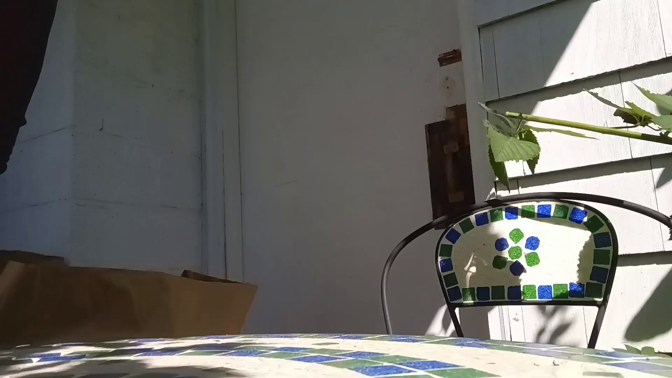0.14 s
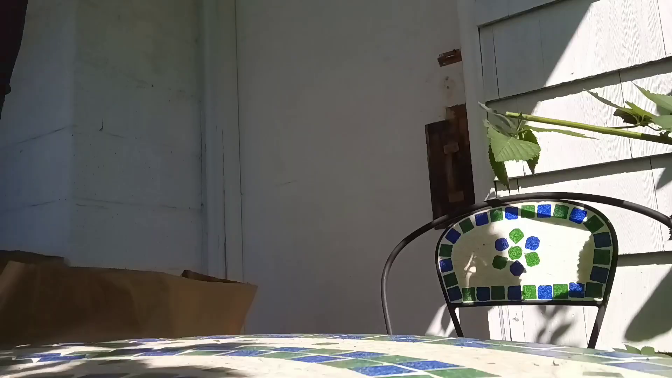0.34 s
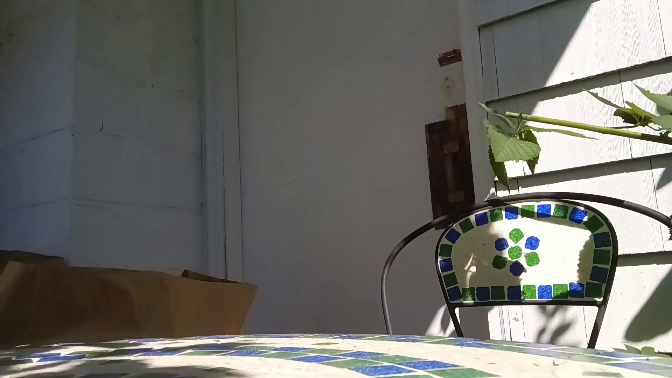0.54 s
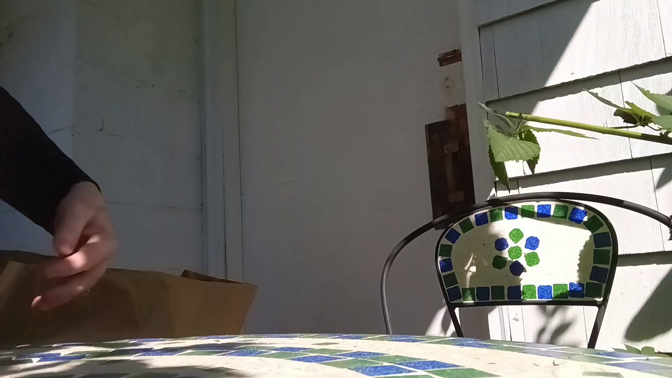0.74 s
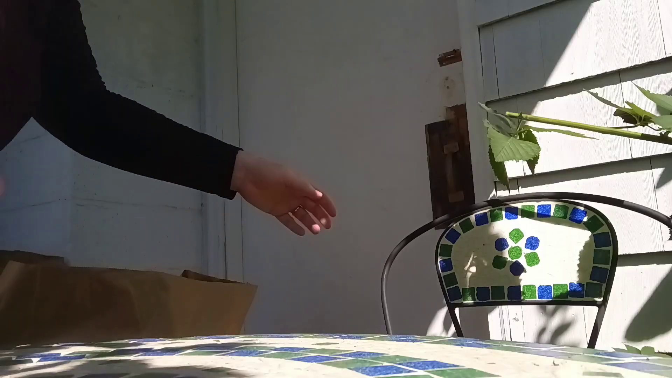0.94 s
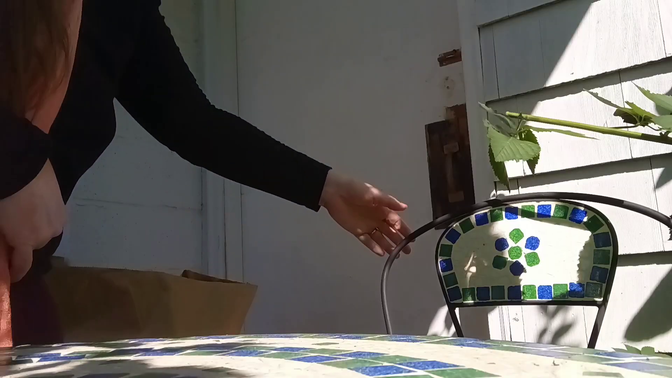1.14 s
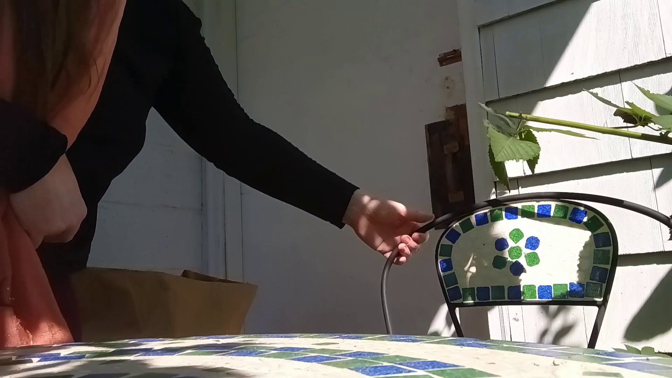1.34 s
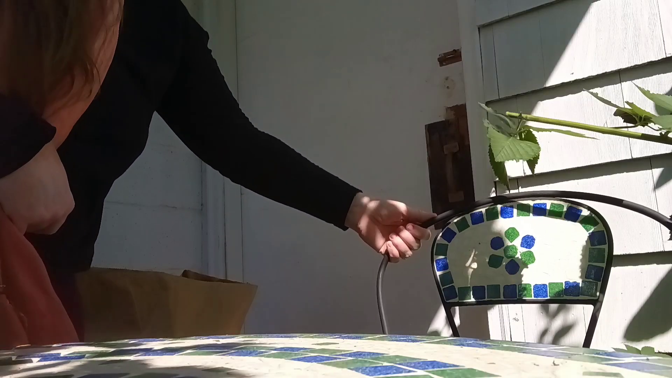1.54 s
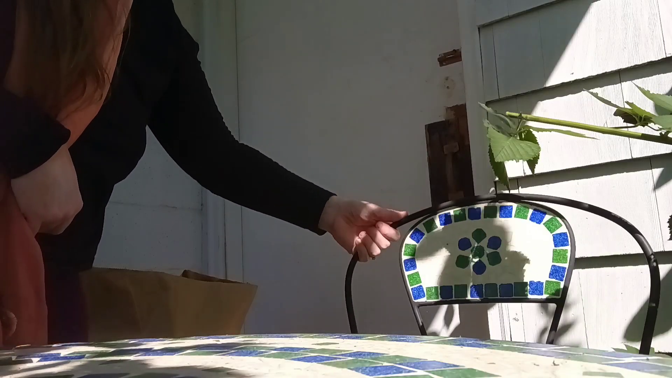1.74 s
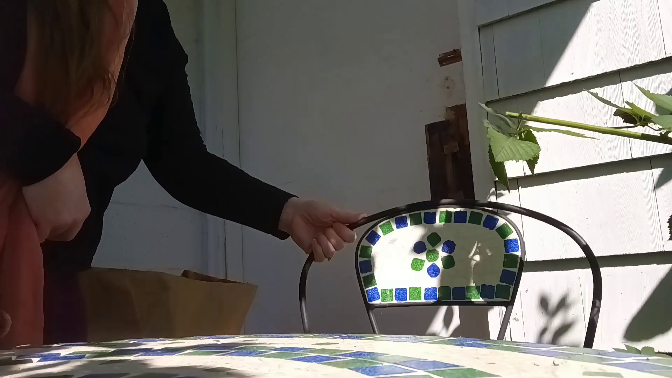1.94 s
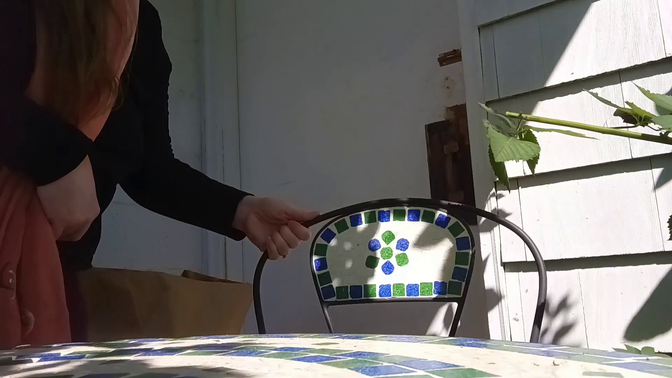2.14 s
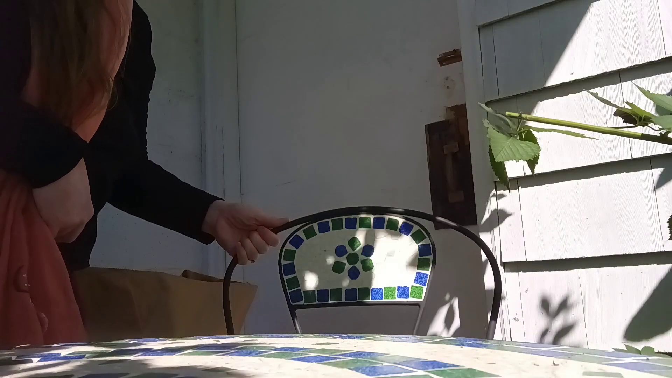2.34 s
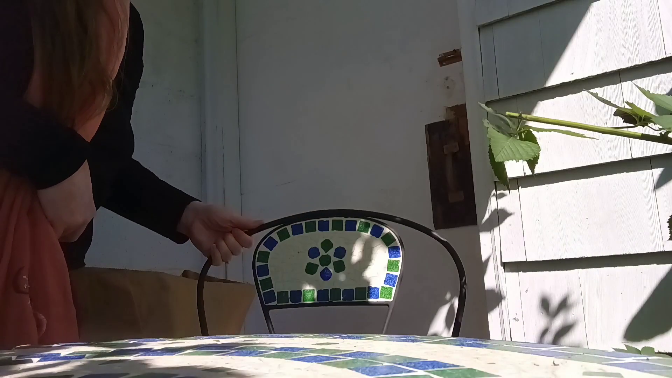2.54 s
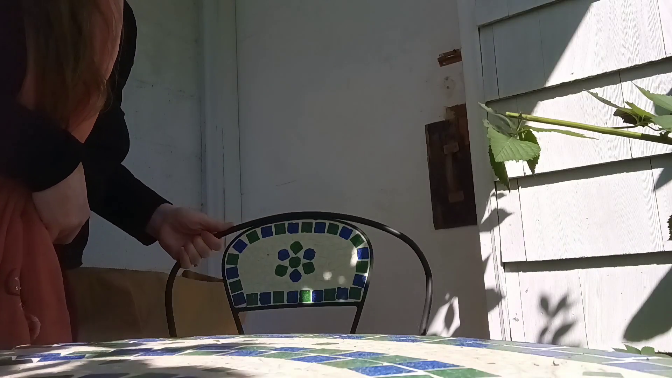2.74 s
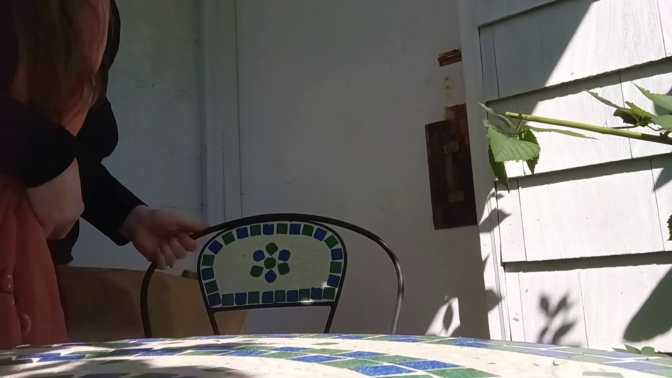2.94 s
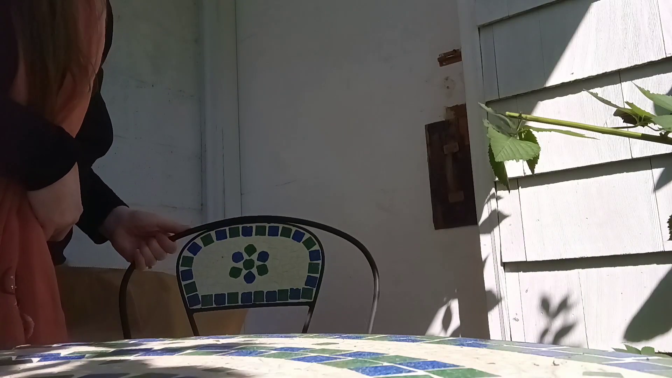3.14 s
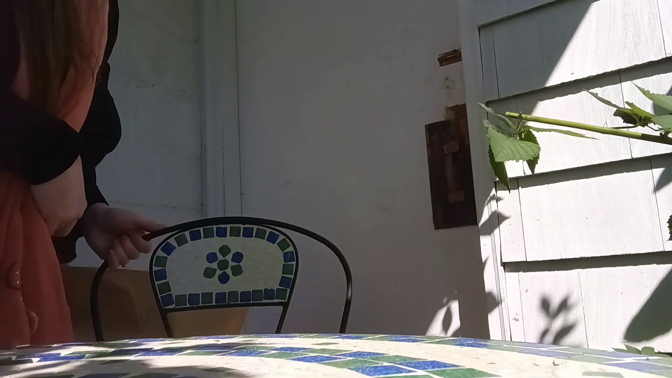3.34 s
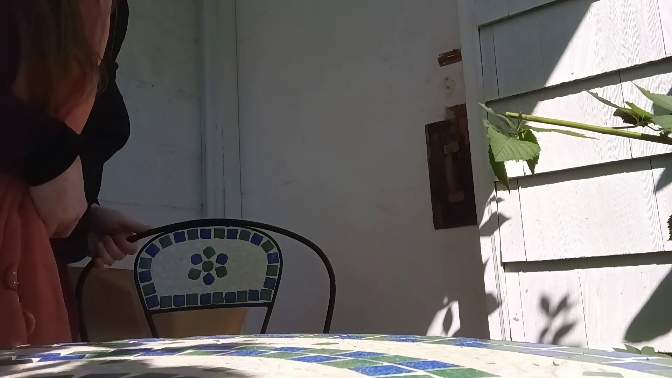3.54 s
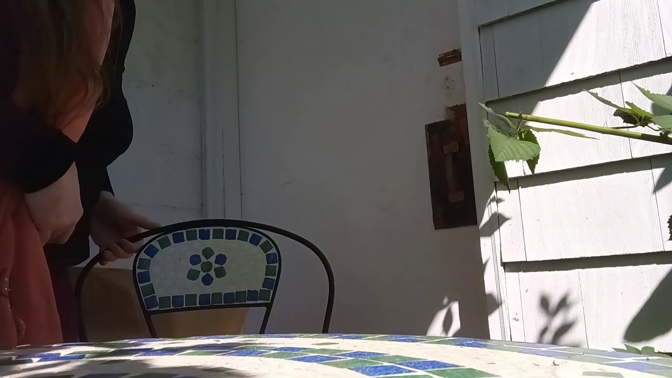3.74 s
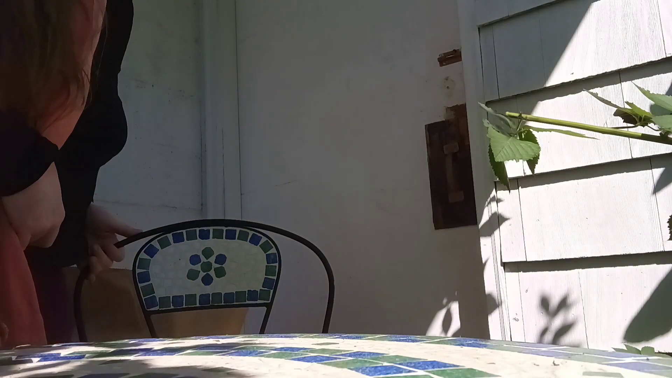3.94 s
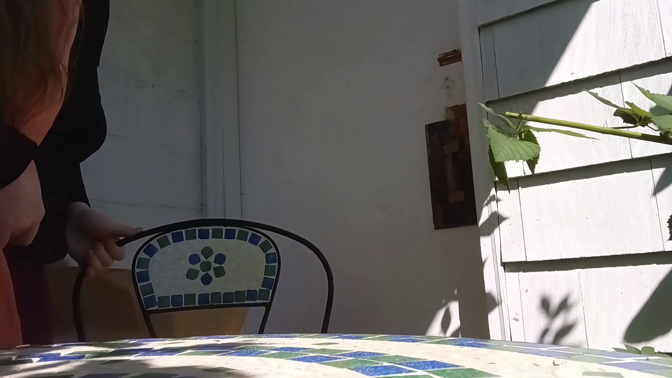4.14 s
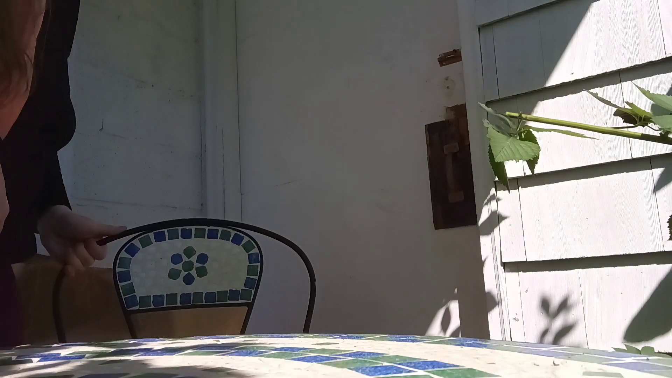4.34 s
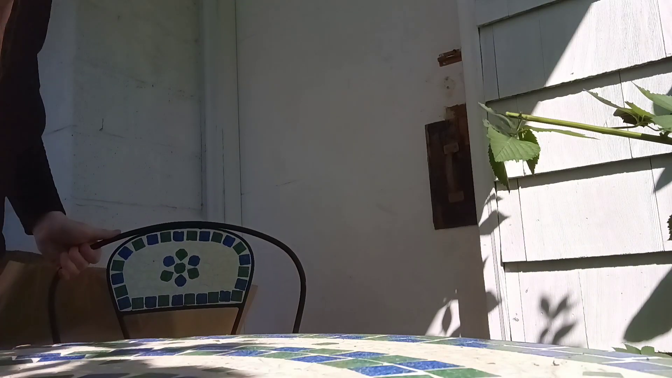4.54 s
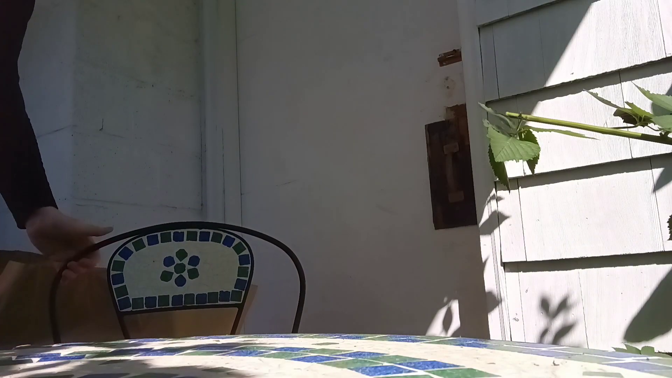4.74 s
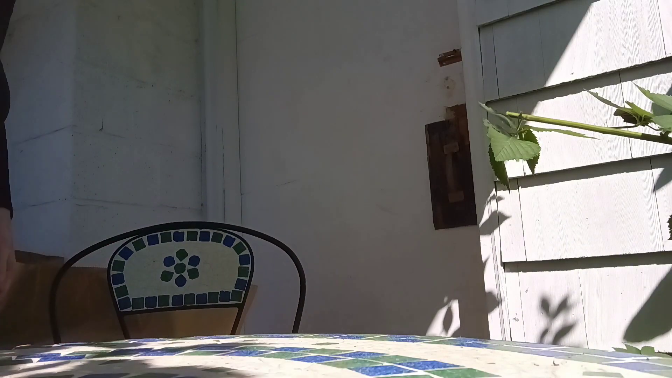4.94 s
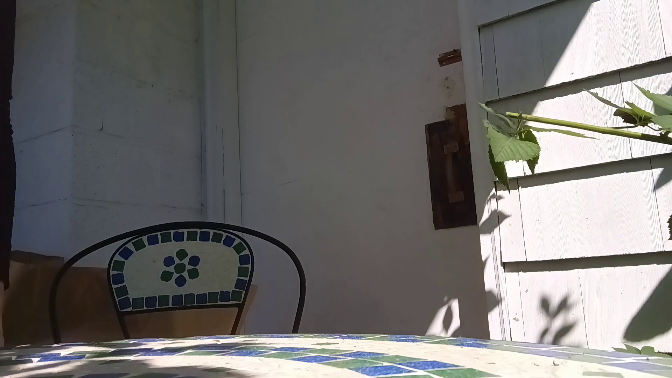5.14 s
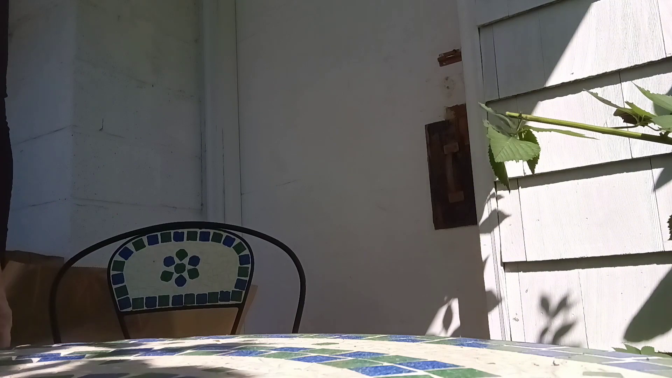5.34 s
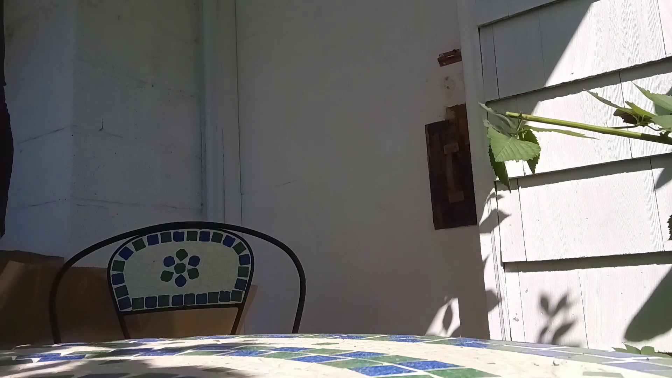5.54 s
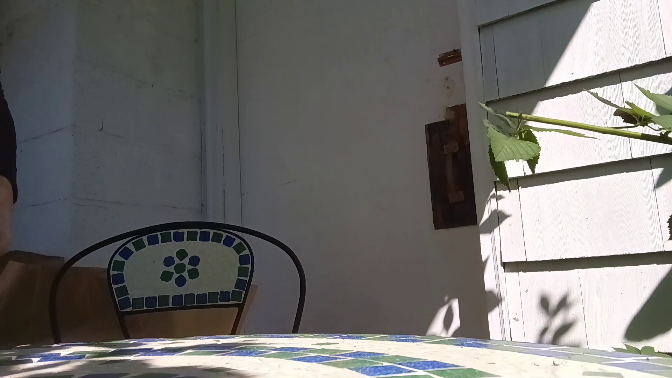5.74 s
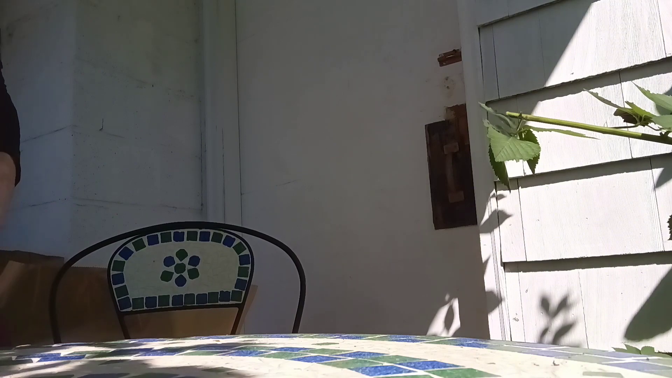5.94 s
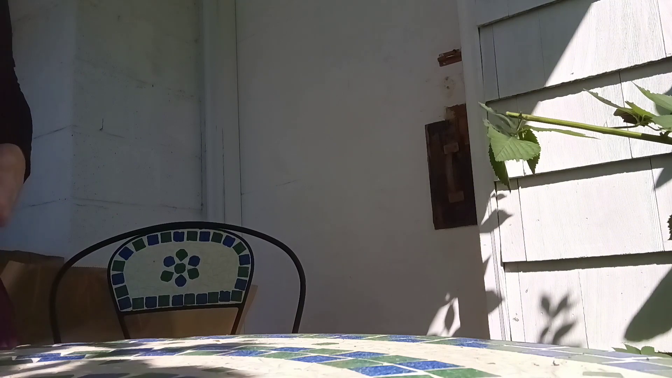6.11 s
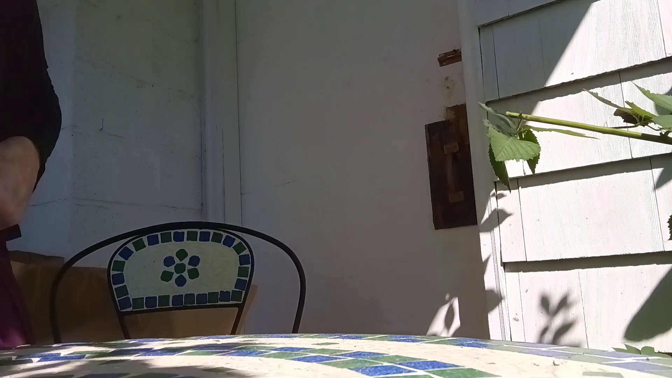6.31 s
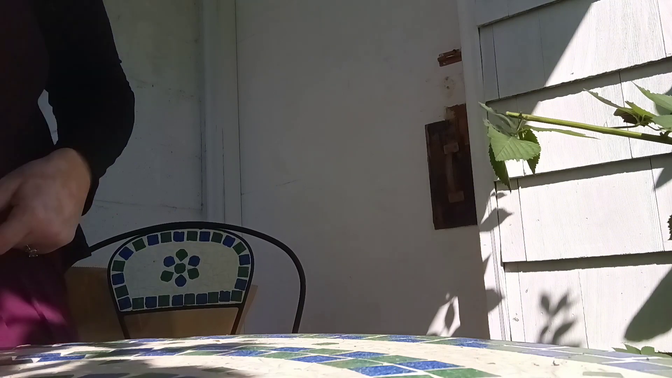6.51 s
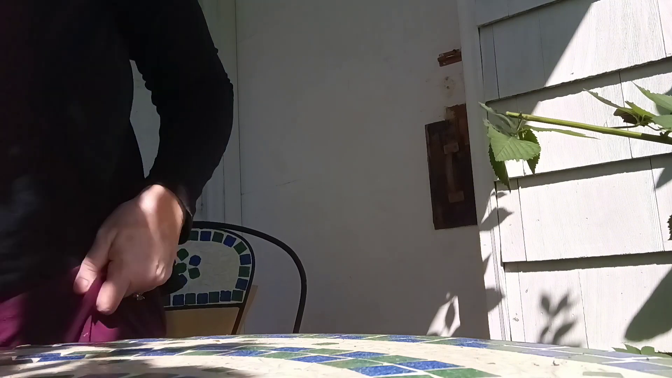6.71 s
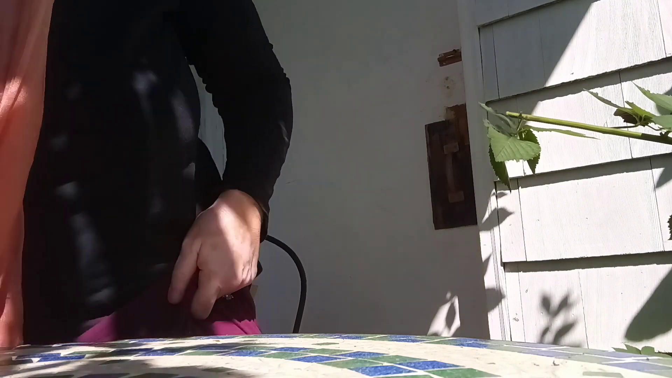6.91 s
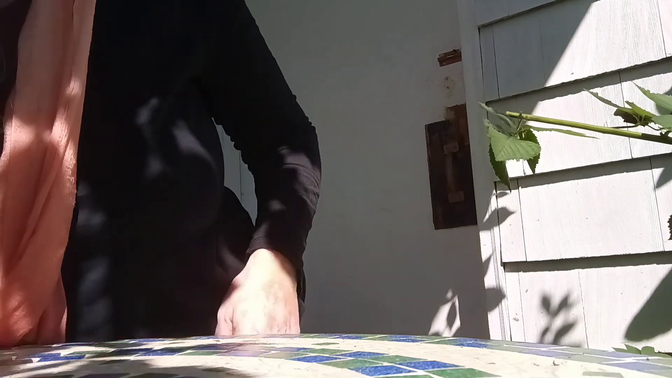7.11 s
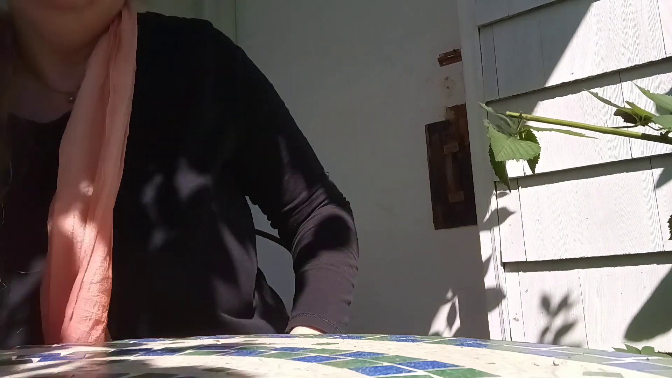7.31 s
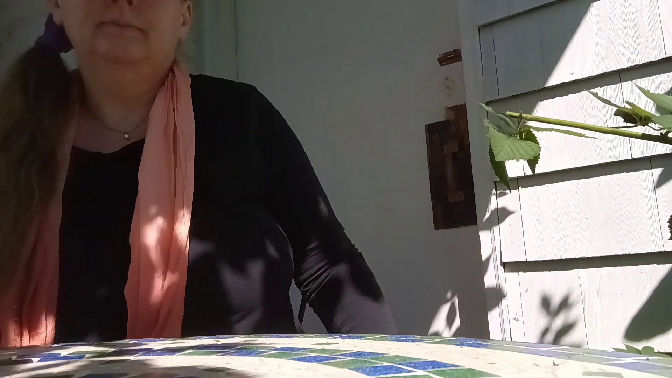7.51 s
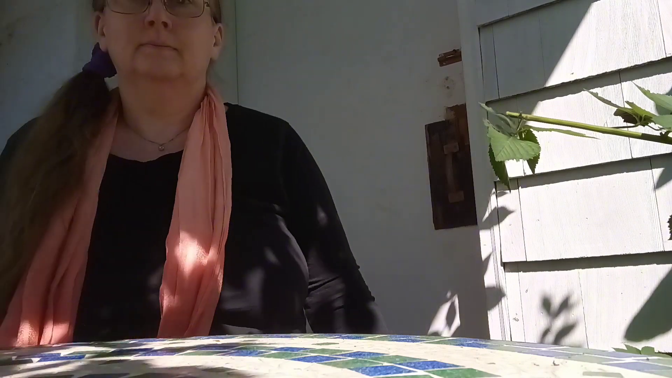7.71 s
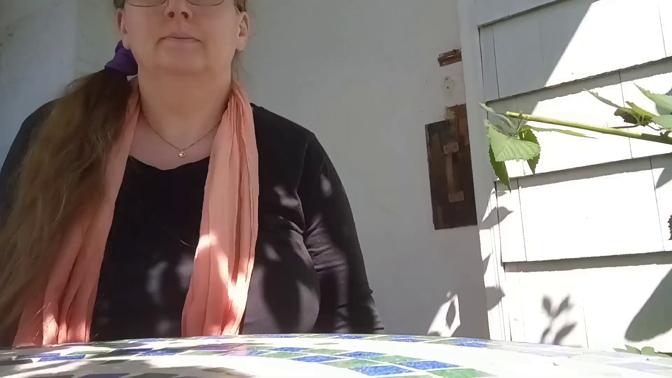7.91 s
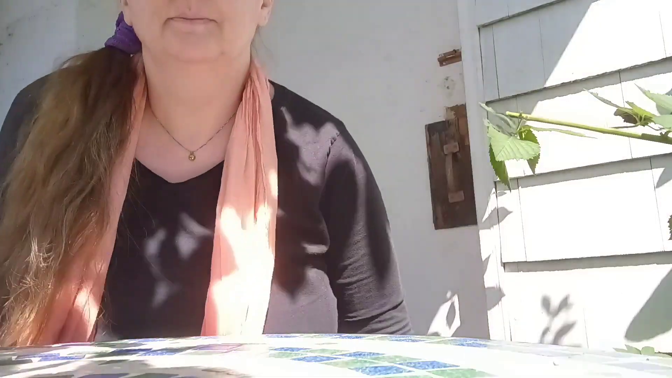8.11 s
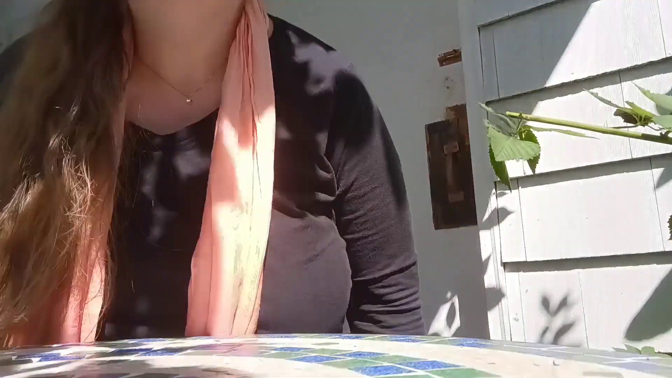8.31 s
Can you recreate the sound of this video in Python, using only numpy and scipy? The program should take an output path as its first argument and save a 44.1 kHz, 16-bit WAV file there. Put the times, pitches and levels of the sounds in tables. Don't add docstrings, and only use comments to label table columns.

```python
import sys
import numpy as np
from scipy import signal
from scipy.fft import rfft, irfft, next_fast_len
from scipy.io import wavfile
from scipy.ndimage import uniform_filter1d, map_coordinates

SR = 44100
rng = np.random.default_rng(int(sys.argv[2]) if len(sys.argv) > 2 else 0)


def gain_from_decibels(decibels):
    exponent = np.asarray(decibels, float) / 20
    return 10 ** exponent


def inscribe(sig):
    pcm = np.round(np.clip(np.atleast_2d(sig).T, -1, 1) * 32767)
    wavfile.write(sys.argv[1], SR, pcm.astype(np.int16))


N = 368763
SIZE = next_fast_len(N + SR)
HZ, T = np.fft.rfftfreq(SIZE, 1 / SR), np.arange(N) / SR
SEATED_S = 7


def read(points, hz=HZ):
    f, value = np.transpose(points)
    return np.interp(np.log(hz + 1), np.log(f + 1), value)


def modes(table):
    response = 0
    for k, (f, width, db) in enumerate(table):
        response = response + (-1) ** k * gain_from_decibels(db) / (1 + 2j * (HZ - f) / width)
    return response


def through(x, response):
    gain = np.sqrt(np.mean(abs(response) ** 2))
    return irfft(rfft(x, SIZE) * response / gain, SIZE)[..., :N]


def noise():
    return rng.standard_normal((2, N))


def wander(hz):
    x = irfft(rfft(rng.standard_normal(N), SIZE) * np.exp(-(HZ / hz) ** 2), SIZE)[:N]
    return x / x.std()


def bump(s, length, skew=0.47):
    out = np.zeros(N)
    span = slice(round(s * SR), round((s + length) * SR))
    out[span] = np.sin(np.pi * np.clip((T[span] - s) / length, 0, 1) ** skew) ** 2
    return out


def dying(s, t60, rise):
    out = np.zeros(N)
    span = slice(round(s * SR), round((s + 2 * t60) * SR))
    u = np.maximum(T[span] - s, 0)
    out[span] = gain_from_decibels(-60 * u / t60) * (1 - np.exp(-u / rise))
    return out


def whistle(s, hz, length, db, width, pulses=0, pure=0, sag_hz=0):
    t = np.arange(round(length * SR)) / SR
    r = np.exp(-np.pi * width / SR)
    re, im = rng.standard_normal((2, 2, SR // 3))[..., :len(t)]
    fuzz = pure + signal.lfilter([np.sqrt(1 - r * r)], [1, -r], re + 1j * im)
    pulse = 1 + .5 * np.sign(pulses) * np.cos(2 * np.pi * pulses * t)
    swell = signal.windows.tukey(len(t), .6) * pulse
    carrier = np.exp(2j * np.pi * (hz + sag_hz * (.5 - .5 * t / length)) * t)
    return s, gain_from_decibels(db) * swell * (fuzz * carrier).real


def add(mix, s, sound):
    part = mix[:, round(s * SR):][:, :sound.shape[-1]]
    part += sound[..., :part.shape[1]]


def rocking(x, patchy_db, size=1024):
    # (time [s], length [s], frequency [Hz], level [dB])
    group_swells = [(1.58, 0.57, 823, -6.5), (2.19, 0.26, 840, -4), (3.4, 0.26, 1170, -4), (3.62, .3, 410, -4),
                    (4.6, 0.33, 352, -5.5), (1.706, 0.53, 495, 11), (1.75, 0.28, 1230, 4), (1.73, 0.17, 3750, -1),
                    (2.11, 0.4, 1220, 3), (2.4, 0.22, 3750, -0.5), (3.8, 0.22, 700, 0), (3.25, 0.13, 4050, -3),
                    (3.36, 0.27, 1530, -8), (3.42, 0.13, 3700, 6.5), (4.309, 0.26, 4420, 5.5),
                    (4.32, 0.26, 5250, -3), (2.4, 0.3, 1490, -4), (4.15, 0.16, 800, -3), (4.25, 0.29, 1700, -1),
                    (4.691, 0.27, 520, 10), (4.729, .35, 950, 0)]
    reach = 0.12
    hz, t, z = signal.stft(x, SR, nperseg=size, noverlap=size * 3 // 4)
    patches = rng.standard_normal(z.shape[:0:-1]).T
    patches = uniform_filter1d(patches, size=3, axis=0)
    patches = uniform_filter1d(patches, size=10240 // size, axis=1)
    patches *= np.linspace(.8, 1.8, len(patches))[:, None] / patches.std()
    group_db = 0
    for s, length, f, db in group_swells:
        group = np.exp(-((hz / f - 1) / reach) ** 2)
        group_course = np.sin(np.pi * np.clip((t - s) / length, 0, 1)) ** .5
        group_db = group_db + db * np.outer(group, group_course)
    z = z * gain_from_decibels(patchy_db * patches + group_db)
    return signal.istft(z, nperseg=size, noverlap=size * 3 // 4)[1][:, :N]


def yard():
    # (frequency [Hz], density [dB per Hz])
    wash_spectrum = [(15, -39), (25, -23), (49, -6.5), (113, -2), (457, -16.5), (804, -14.5), (1200, -19.5),
                     (3170, -22.5), (4500, -20.5), (5430, -9.5), (6210, -15), (6730, -12), (8500, -24),
                     (11200, -35), (14300, -49), (15500, -44)]
    # (time [s], level [dB], frequency [Hz])
    hum_track = [(0.1, -48, 120), (0.28, -43, 121.8), (1.02, -60, 121.6), (1.589, -49, 121),
                 (3.6, -57.5, 113.7), (4.05, -58, 112), (4.85, -40.5, 110.2), (5.901, -58, 114.6),
                 (6.38, -45.5, 112.4), (6.661, -54, 120.1), (7.3, -48, 120.8), (7.55, -42, 113.3),
                 (7.64, -45, 109), (8.36, -59, 116.5)]
    wash = gain_from_decibels(-49.5 + 0.31 * wander(0.65)) * through(noise(), gain_from_decibels(read(wash_spectrum)))
    s, hum_db, hum_hz = np.transpose(hum_track)
    turn = 2 * np.pi * np.cumsum(np.interp(T, s, hum_hz)) / SR
    hum = (1.19 + wander(28)) * np.cos(turn) + 0.83 * wander(15.4) * np.sin(turn)
    return wash + gain_from_decibels(np.interp(T, s, hum_db) - 1.5) * hum


def buzz():
    whine_hz, width_hz, mains_hz = 14150, 110, 60.25
    turn = 2 * np.pi * mains_hz * T
    pulse = 1 + 0.2 * np.cos(turn) + 0.25 * np.cos(2 * turn)
    fuzz = .3 * through(noise(), modes([(whine_hz, width_hz / 3, 0)]) ** 2)
    tone = 1.3 * np.cos(2 * np.pi * np.cumsum(whine_hz + 15 * wander(30.1)) / SR)
    return gain_from_decibels(-76.5) * pulse * (fuzz + tone)


def crickets():
    # (frequency [Hz], width [Hz], level [dB], pulse rate [1/s])
    chorus = [(6930, 27, -58.5, 13), (6780, 200, -64.5, 10), (5600, 2600, -63.5, 37)]
    # (time [s], frequency [Hz], length [s], level [dB])
    phrases = [(0.203, 5160, 0.22, -54), (0.315, 6020, .1, -57), (0.373, 5600, 0.1, -55),
               (0.627, 6170, .1, -63), (0.514, 5100, 0.13, -50), (0.725, 5100, 0.05, -59),
               (1.078, 5410, 0.17, -56), (1.508, 5400, .08, -54), (5.446, 5230, 0.19, -59.5),
               (5.567, 6200, 0.09, -56), (5.54, 5660, 0.2, -56), (5.689, 5400, 0.14, -53),
               (5.728, 4950, .07, -59), (5.849, 6100, 0.3, -60), (5.93, 5300, 0.085, -60),
               (6.1, 5130, 0.092, -57.5), (5.863, 5660, 0.31, -55.5), (6.184, 6170, 0.12, -58),
               (6.374, 5670, 0.17, -63), (6.313, 5530, 0.23, -58), (6.89, 6230, .1, -53.5),
               (7.134, 5180, 0.1, -50), (7.228, 6090, 0.12, -51.5), (7.544, 6130, 0.15, -53),
               (7.752, 5730, 0.16, -54), (7.91, 6125, 0.092, -52.5), (7.923, 5950, .1, -71),
               (8.192, 6100, 0.13, -54.5), (8.211, 5630, 0.12, -47)]
    # (time [s], level [dB])
    chirps = [
        (0.152, -52),
        (0.603, -50),
        (0.968, -51),
        (1.423, -50),
    ]
    out = np.zeros((2, N))
    for hz, width, db, pulses in chorus:
        beat = np.cos(2 * np.pi * pulses * np.cumsum(1 + 0.0406 * wander(1.485)) / SR)
        throb = 1 + .9 * beat
        out += gain_from_decibels(db + 2.3 * wander(4.0)) * throb * through(noise(), modes([(hz, width, 0)]) ** 2)
    for s, hz, length, db in phrases:
        add(out, *whistle(s, hz, length, db + 0.5, 30, pulses=35.4, pure=.8, sag_hz=161))
    for s, db in chirps:
        for k in range(3):
            pulse_db = db + 0.8 * k - 2.5
            add(out, *whistle(s + 0.0348 * k, 4555 + 25 * k, 0.032, pulse_db, 55, pure=1.5, sag_hz=-120))
    return out


def scuffs():
    # (time [s], level [dB], low part relative [dB], low part frequency [Hz], length [s])
    brushes = [(0.498, -32.5, -14, 2010, 0.13), (0.549, -46, -11.5, 521, 0.12),
               (0.947, -50.5, 12.5, 890, 0.066), (0.975, -30.5, -22, 717, 0.057),
               (1.222, -40.5, -24, 792, 0.12), (1.284, -28, -13.5, 1320, 0.066),
               (3.982, -38.5, -2.5, 968, 0.071), (5.22, -28, -11, 1920, 0.089),
               (5.723, -44, -5, 688, 0.069), (6.087, -39, -9.5, 701, 0.13), (6.669, -29.5, -17, 2010, 0.1),
               (6.713, -24, -14.5, 2460, 0.097), (6.881, -25, -16.5, 2380, 0.056),
               (7.03, -22.5, -40, 500, 0.072), (7.075, -17.5, -49.5, 2300, 0.079)]
    # (frequency [Hz], density [dB per Hz])
    hiss = [(710, -68), (1200, -30), (2210, -26), (2920, 0), (4340, 0), (5370, 8.5), (8980, -4.5),
            (11200, -21), (15500, -60)]
    high = sum(gain_from_decibels(db - 13) * bump(s, 1.21 * length, skew=0.48) for s, db, _, _, length in brushes)
    out = through(high * rocking(noise(), patchy_db=3.0), gain_from_decibels(read(hiss)))
    for s, db, low_db, low_hz, length in brushes:
        add(out, *whistle(s - .01, low_hz, length, db + low_db - 11.0, 440))
    return out


def effort():
    # (time [s], length [s], speed of the feet [dB], weight on the frame [dB])
    lurches = [(1.608, 0.14, -41, -49.5), (1.695, 0.09, -20.5, -28.5), (1.769, 0.15, -22, -22.5),
               (1.856, 0.22, -23, -33.5), (2.025, 0.17, -29, -32.5), (2.085, 0.18, -23.5, -27.5),
               (2.174, 0.43, -17.5, -28), (2.408, 0.26, -21, -31), (2.564, 0.2, -24.5, -31.5),
               (2.676, 0.69, -30.5, -31.5), (2.81, 0.41, -32.5, -30.5), (2.948, 0.23, -31, -28.5),
               (3.074, 0.25, -35.5, -23.5), (3.288, 0.25, -28, -26.5), (3.408, 0.21, -24.5, -18),
               (3.52, 0.32, -46, -36.5), (4.206, 0.15, -44, -41), (4.28, 0.11, -28.5, -25),
               (4.335, 0.13, -23, -67), (4.41, 0.23, -23, -19.5), (4.499, 0.17, -28, -19.5),
               (4.607, 0.21, -34, -21.5), (4.682, 0.11, -35, -27), (4.793, 0.12, -82, -42),
               (7.362, 0.21, -29, -41), (7.496, 0.075, -28.5, -54), (8.323, 0.2, -30, -25.5)]
    # (time [s], level [dB], length [s])
    landings = [(1.576, -44.5, 0.073), (2.936, -37.5, 0.48), (3.379, -32.5, 0.15), (3.503, -34, 0.21),
                (4.245, -33, 0.24), (4.582, -29, 0.32), (4.98, -42.5, 0.069), (5.098, -41.5, 0.049),
                (7.351, -29.5, 0.32), (7.67, -51, 0.41), (8.052, -41.5, 0.22), (1.685, -35, 0.056),
                (1.88, -41, 0.097), (2.06, -40, 0.08), (2.307, -59, .12), (3.7, -45, 0.19)]
    power = sum(gain_from_decibels(2 * np.c_[[speed, weight]]) * bump(s, length) for s, length, speed, weight in lurches)
    speed_db, weight_db = 10 * np.log10(power + 1e-12)
    by_speed = 0.88
    tubes_db = -0.5 + by_speed * speed_db + (1 - by_speed) * weight_db
    fine_db = -13 + 0.35 * (speed_db - weight_db) + 0.31 * np.maximum(speed_db, -40)
    thumps = sum(gain_from_decibels(db) * bump(s, length) for s, db, length in landings)
    ground = np.hypot(gain_from_decibels(-2.5 + 1.96 * weight_db), thumps)
    return gain_from_decibels(speed_db), gain_from_decibels(tubes_db), gain_from_decibels(weight_db), ground, gain_from_decibels(fine_db)


def stick_slip():
    # (time [s], level [dB], decay t60 [s])
    breaks = [(1.58, -15, 0.21), (1.591, -10, 0.18), (1.6977, 4.5, 0.21), (1.779, 4, 0.39), (1.92, -4, 0.7),
              (2.003, -27, 0.055), (2.0434, -6, 0.33), (2.120, -8, 0.19), (2.156, -4.5, 0.23),
              (2.181, -8, .1), (4.676, -27, 0.088), (4.842, -27, 0.095), (3.64, -29, 0.16),
              (2.432, 3, 0.64), (2.716, -6.5, 0.1), (2.938, -13, 0.12), (3.048, -23, 0.12),
              (3.147, -6, 0.18), (3.336, -10, 0.21), (3.414, -14.5, 0.25), (3.464, -2.5, 0.32),
              (3.592, -27, 0.12), (4.289, -13, 0.42), (4.328, -1.5, 0.19), (2.285, 5, 0.3),
              (2.4645, -1, 0.2), (2.886, -3, 0.16), (3.278, -6, 0.11), (4.22, -22, 1), (4.353, 5, 0.31),
              (4.455, -6, 0.12), (4.506, -0.5, 0.19), (7.375, 3.5, 0.12), (7.506, -12, 0.2),
              (8.275, -20.5, 0.13), (8.336, -22, 0.28)]
    slips = sum(gain_from_decibels(db - 14.5) * dying(s, t60, 0.0024) for s, db, t60 in breaks)
    snaps = sum(gain_from_decibels(db - 13.5) * dying(s, 0.038, 0.00027) for s, db, _ in breaks)
    stuck = np.ones(N)
    for s, _, _ in breaks:
        stuck *= 1 - 0.27 * (T < s) * np.exp(np.minimum(T - s, 0) / 0.016)
    judder = stuck * gain_from_decibels(1.38 * wander(25.5) + 1.0 * wander(110) + 2.14 * wander(610))
    return slips, judder, snaps


def knocks():
    # (time [s], level [dB], decay t60 [s])
    pushes = [(1.605, -16.5, 0.041), (1.641, -24.5, 0.079), (1.701, -6.5, 0.065), (1.831, -26, 0.055),
              (3.221, -22.5, 0.14), (3.246, -23.5, 0.04), (3.432, -25, 0.041), (3.608, -16.5, 0.11),
              (3.635, -13, 0.089), (4.259, -25, 0.043), (5.03, -37.5, 0.11), (6.169, -36.5, 0.17),
              (7.368, -18, 0.29), (8.12, -49, 0.15), (8.257, -50, 0.098)]
    return sum(gain_from_decibels(db + 4.0) * dying(s, t60, 0.012) for s, db, t60 in pushes)


def scraping_feet(grit, fine_force):
    # (frequency [Hz], width [Hz], level [dB])
    foot_modes = [(2820, 8.3, -17), (3777, 40, 2), (5000, 42, 2), (5082, 115, 4.5), (5230, 1930, -8),
                  (6200, 83, -13), (6960, 21, 6), (7630, 110, -2), (8540, 52, -5.5), (9510, 42, 2),
                  (9900, 580, -16.5), (11900, 140, -12.5), (4040, 32, -10), (13310, 340, -8)]
    # (frequency [Hz], density [dB per Hz])
    grit_spectrum = [(880, -19), (1500, -4), (3350, -7.5), (3880, -3), (4300, -13.5), (5100, 4), (9820, -7),
                     (10600, -55), (13800, -23), (14700, -13), (15600, -29)]
    lattice = rfft(rng.standard_normal(N) * dying(0, .09, 0.00059), SIZE)
    lattice = .5 + lattice / np.sqrt(np.mean(abs(lattice) ** 2))
    foot = modes(foot_modes) + lattice * gain_from_decibels(read(grit_spectrum) - 8.5)
    fine = 1 / (1 + (9000 / (HZ + 1)) ** 12)
    return through(grit, foot * (1 - fine)) + through(grit * fine_force, foot * fine)


def pinned_feet(grit, cracks):
    # (frequency [Hz], density [dB per Hz])
    pressed = [(710, -29), (1200, -13), (1440, -16), (1600, -16), (5000, 2.5), (7080, 5.5), (8570, -6),
               (13900, -27), (15000, -22)]
    response = gain_from_decibels(read(pressed))
    return gain_from_decibels(3.0) * through(grit * (T > SEATED_S), response) + through(cracks, response)


def ringing_tubes(shake, steep):
    # (frequency [Hz], width [Hz], level [dB])
    tube_modes = [(604, 195, -5.5), (726, 28, 3.5), (802, 29, -1), (854, 9.5, -4.5), (903.3, 13, 1.5),
                  (962, 16, -2), (1005, 19, 5), (1085, 20, -5.5), (1167, 8.8, -1.5), (1248.6, 22, -0.5),
                  (1380.5, 15.3, -2.5), (1426, 12, -16), (1440, 400, -13), (1804, 200, -11), (1983, 27, -9),
                  (2392, 29, -9.5), (2562, 45, -12.5)]
    # (frequency [Hz], width [Hz], level [dB])
    further_modes = [(915, 40, 1.5), (1045, 17, -8.5)]
    return through(shake * (T < SEATED_S), (modes(tube_modes) + modes(further_modes)) * steep)


def swaying_frame(push):
    # (frequency [Hz], width [Hz], level [dB])
    sway_modes = [(193.5, 9.7, -8.5), (275, 20.6, -0.5), (313, 58.4, -1.5), (336, 33, 3), (424.6, 11.7, -7),
                  (456, 19.6, -14.5), (634.2, 16, -7)]
    return through(push * (T < SEATED_S), modes(sway_modes) / (1 + (160 / (HZ + 1)) ** 4))


def loaded_seat(press, push, steep):
    # (frequency [Hz], width [Hz], level [dB])
    seat_modes = [(479, 6.6, 17.5), (588, 24, 13), (703, 12, 13), (794, 24, 3), (915, 15, -14),
                  (990, 17, -3), (1240, 60, -9.5), (1375, 86, -7), (2400, 260, -19.5)]
    # (frequency [Hz], width [Hz], level [dB])
    sag_modes = [(162, 15, -7), (306, 22, 0), (416, 31, -2.5)]
    seat = gain_from_decibels(8.0) * through(press * (T > SEATED_S), modes(seat_modes) * steep)
    return seat + through(push * (T > SEATED_S), modes(sag_modes) * HZ / (HZ + 200))


def ground_thud(force):
    ground = modes([(63.7, 17.0, 6.5), (77.7, 48, 5.5), (132, 57, 2.5), (197.0, 22, 0.0)])
    return through(force * noise(), ground / (1 + (45 / (HZ + 1)) ** 4))


def ringing(x):
    tail = rfft(noise() * dying(0.024, 1.8, 0.009), SIZE) * modes([(830, 1800, 0)])
    return gain_from_decibels(-28.0) * through(x, tail)


def flexing(x):
    at = np.arange(N) + 0.000201 * SR * wander(4.12)
    return np.array([map_coordinates(side, [at], order=3) for side in x])


def chair():
    speed, tube_force, weight, ground, fine_force = effort()
    slips, judder, snaps = stick_slip()
    blows = knocks()
    grains = noise() * gain_from_decibels(2.28 * np.minimum(rng.exponential(1, N), 5) - 8.0)
    grit = np.hypot(speed * judder, slips) * grains
    feet = scraping_feet(grit, fine_force)
    pinned = pinned_feet(grit, snaps * grains)
    shake = np.sqrt((tube_force * judder) ** 2 + (0.09 * slips) ** 2 + (0.21 * blows) ** 2) * noise()
    steep = 1 / (1 + (420 / (HZ + 1)) ** 4)
    tubes = ringing_tubes(shake, steep)
    push = np.hypot(weight * gain_from_decibels(2.0 * wander(24)), blows) * noise()
    sway = swaying_frame(push)
    seat = loaded_seat(np.hypot(weight, blows) * grains, push, steep)
    thud = ground_thud(ground)
    loose_feet = rocking(feet * (T < SEATED_S), patchy_db=3.0, size=512)
    bent = flexing(loose_feet + rocking(tubes, patchy_db=3.5))
    rung = ringing(tubes + .5 * sway)
    return gain_from_decibels(0.5) * (bent + pinned + rung + rocking(sway, patchy_db=1.4) + seat + thud)


def bongs():
    # (time [s], level [dB], frequency [Hz], decay t60 [s])
    strikes = [(1.644, -17, 303, 0.083), (1.835, -12.5, 274, 0.073), (2.944, -17.5, 355, 0.11),
               (3.133, -22.5, 283, 0.08), (3.22, -8, 312, 0.066), (3.247, -9, 330, 0.087),
               (3.613, -11, 328, 0.13), (3.631, -12, 347.5, 0.12), (4.259, -18, 335, 0.12),
               (4.419, -12.5, 325, 0.084), (4.806, -26, 210, 0.21), (4.849, -36, 220, 0.17),
               (5.038, -30, 235, 0.15), (6.17, -39, 334.5, 0.21),
               (3.564, -23, 138, 0.19), (3.638, -23.5, 1005, 0.17), (3.709, -33, 117, 0.14),
            (4.85, -32.5, 740, 0.17), (6.175, -40, 637, 0.13), (6.175, -51, 990, 0.13),
            (7.54, -24, 112, 0.33), (7.748, -43, 750, .06), (8.25, -40.5, 426, 0.34),
            (4.78, -29.5, 522, 0.29), (1.62, -32, 1017, 0.27)]
    # (frequency [Hz], level [dB], decay t60 [s])
    landing = [(172, -6.5, 0.34), (285.5, -6, 0.55), (393, -19, 0.29), (529, -3, 0.4), (608, 11, 0.22),
               (700, 2, 0.21), (792, -8, 0.2), (882, -2, 0.25), (1034, -9, 0.18), (1233, -1.5, 0.073),
               (1380, -16.5, 0.11)]
    landing_s, landing_db = 7.372, -21.5
    rings = strikes + [(landing_s, db + landing_db, hz, t60) for hz, db, t60 in landing]
    out = np.zeros((2, N))
    t = np.arange(SR // 3) / SR
    for s, db, hz, t60 in rings:
        decay = gain_from_decibels(db - 1.0 - 60 * t / t60) * (1 - np.exp(-t / 0.0021))
        add(out, s, decay * np.sin(2 * np.pi * (hz * t + rng.random())))
    return out


def squeaks():
    # (time [s], level [dB], frequency [Hz], length [s])
    chatters = [(2.618, -30, 5100, .3), (2.88, -21, 9560, 0.048), (2.864, -15.5, 5100, 0.12),
                (2.922, -11.5, 7730, 0.055), (3.003, -19, 5080, 0.24), (3.268, -19.5, 4980, 0.076),
                (3.337, -19.5, 5200, 0.038), (3.405, -19, 7960, 0.046), (3.466, -16.5, 8400, 0.065),
                (3.1, -31, 3980, 0.033), (6.125, -43.5, 9600, 0.06), (7.747, -38.5, 2860, 0.037),
                (4.517, -36, 3780, 0.3), (11, -40, 7670, 0.035), (1.78, -30, 4400, .05),
                (2.282, -10, 6350, .035), (2.3, -2, 6940, 0.082), (4.36, -18, 4750, .07),
                (4.508, -16.5, 5200, 0.064), (4.6, -32.5, 6100, 0.063), (4.68, -31.5, 5900, 0.092),
                (4.56, -29, 7200, 0.078), (2.94, -41, 7800, 0.089), (3.33, -33, 9570, 0.048)]
    out = np.zeros((2, N))
    for s, db, hz, length in chatters:
        add(out, *whistle(s, hz, length, db - 9.5, 92))
    return out


def ports(pair, phase, balance, same):
    a, b = rfft(pair, SIZE)
    c = np.clip(read(same), 0, 1)
    tilt = gain_from_decibels(read(balance) / 2)
    turn = np.exp(1j * np.interp(HZ, *np.transpose(phase)))
    left = tilt * turn * (c * a + np.sqrt(1 - c ** 2) * b)
    return irfft(np.array([left, a / tilt]), SIZE)[:, :N]


def scene():
    # (frequency [Hz], coherence [0-1])
    chair_ports = [
        [(0, -0.5), (1030, -5.5), (2070, -12), (2840, -21.5), (4820, -27), (5080, -27.5), (7490, -34.5), (8100, -41), (9130, -40), (10200, -36.5), (10900, -38), (11600, -27.5), (14500, -12.5), (15200, -17)],
        [(60, 5.5), (300, 6), (700, 5.5), (1400, 7), (3000, 6.5), (5500, -3.5), (8000, 11.5), (11000, -17), (14000, -11)],
        [(100, 1), (500, 0.88), (1400, 0.8), (3000, 0.083), (8000, 0.14), (14000, 0.57)],
    ]
    yard_ports = [
        [(0, -1), (600, -2), (1210, -10.5), (3010, -12), (5170, -30.5), (5680, -35), (7580, -46), (8350, -61.5), (10500, -49.5), (11300, -71.5), (12100, -41.5), (12800, -43), (14100, -47.5), (15200, -77)],
        [(60, 4), (110, 5), (200, 4.5), (380, 6.5), (700, 6.5), (1290, 6), (2380, 4.5), (4400, -2.5), (8120, 7), (15000, -21.5)],
        [(100, 1), (400, 0.72), (1500, 0.043), (6000, 0.085), (14000, 0.27)],
    ]
    far = ports(yard() + buzz() + crickets(), *yard_ports)
    near = ports(scuffs() + chair() + bongs() + squeaks(), *chair_ports)
    return near + far


def masked(x):
    # (frequency [Hz], level under the whole sound [dB])
    threshold = [(1500, -66), (2200, -54), (4500, -52), (5000, -62), (8500, -58), (10500, -46),
                 (12000, -47.5), (12800, -59), (14400, -60), (14900, -53), (16000, -52)]
    hz, t, z = signal.stft(x, SR, window="cosine", nperseg=2048, noverlap=1024)
    power = (abs(z[:, :1024]) ** 2).mean(0)
    band_db = 10 * np.log10(power.reshape(128, 8, -1).mean(1) + 1e-16)
    whole_db = 5 * np.log10(power.sum(0) * power[70:].sum(0) + 1e-30)
    edge_db = read(threshold, hz[4:1024:8])[:, None] + whole_db
    edge_db = edge_db + 0.26 * (whole_db + 28)
    edge_db = edge_db + 3.2 * rng.standard_normal(band_db.shape[::-1]).T
    keep = 1 / (1 + gain_from_decibels(np.clip(30 * (edge_db - band_db), -60, 60)))
    keep = np.repeat(keep, 8, axis=0)
    z = z * np.r_[keep, keep[-1:]]
    return signal.istft(z, SR, window="cosine", nperseg=2048, noverlap=1024)[1][:, :N]


def low_pass(x):
    return signal.sosfilt(signal.butter(12, 15710, fs=SR, output="sos"), x)


def record(dry):
    # (time [s], level [dB])
    fade = [
        (0.05, -64),
        (.15, -20),
        (.25, -2.5),
        (.35, -0.5),
    ]
    top = gain_from_decibels(read([(14300, -0.5), (14800, -7), (16000, -9)]))
    dull = irfft(rfft(dry, SIZE) * top, SIZE)[:, :N]
    mix = masked(np.tanh(dull)) * gain_from_decibels(np.interp(T, *np.transpose(fade)))
    return low_pass(mix)


dry = scene()
out = record(dry)
inscribe(out)
```